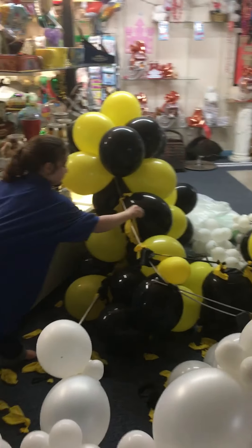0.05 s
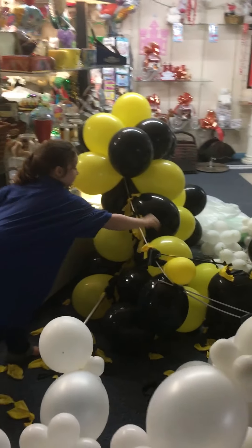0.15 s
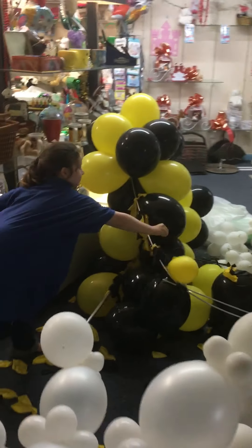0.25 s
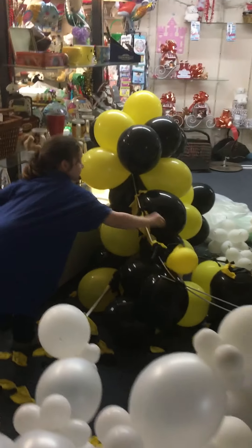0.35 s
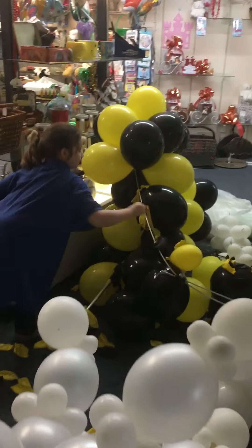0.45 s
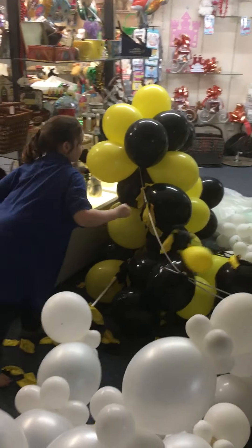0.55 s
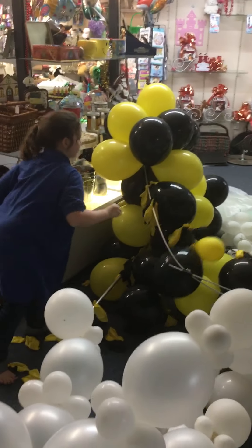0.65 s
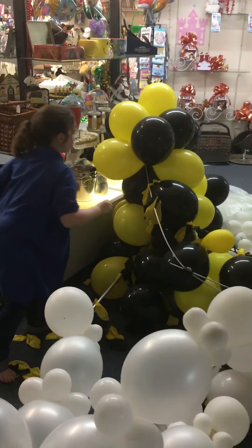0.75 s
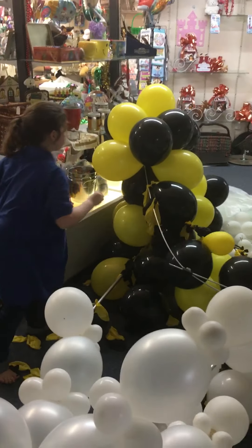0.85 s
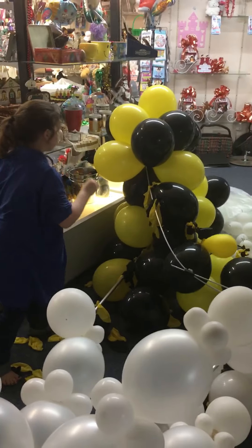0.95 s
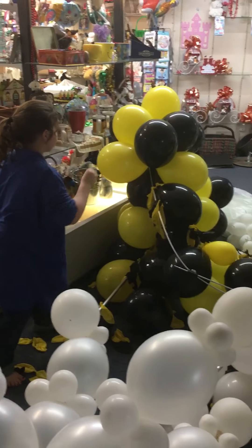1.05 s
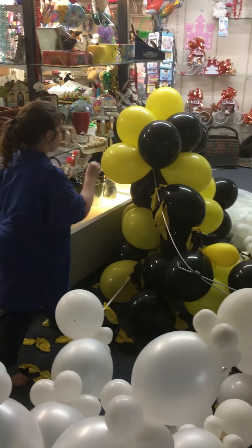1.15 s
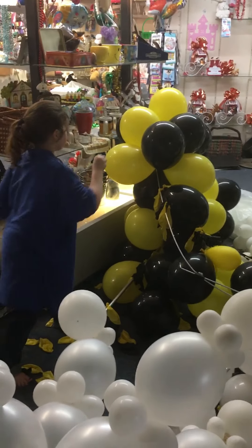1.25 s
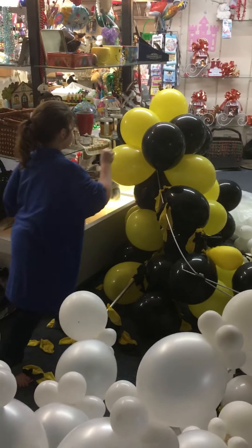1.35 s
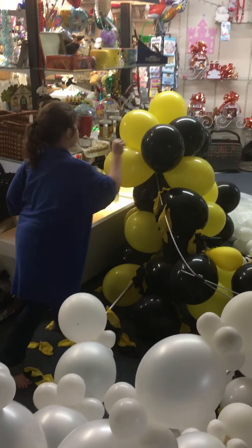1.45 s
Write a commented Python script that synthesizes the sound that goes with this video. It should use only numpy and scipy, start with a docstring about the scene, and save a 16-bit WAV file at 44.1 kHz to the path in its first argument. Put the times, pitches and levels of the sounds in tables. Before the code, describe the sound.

One balloon is pricked and bursts with a sharp, booming bang after a quiet moment; the small shop rings briefly, then rubber scraps and balloons rustle faintly over low rumble, heard by one microphone within the room.

```python
"""A low rumble and a faint rustle, then a balloon is pricked and bursts in a small, crowded, carpeted shop.
The pin snaps through the rubber; a moment later the skin rips open and the air thumps out, ringing the room.
Afterwards scraps of rubber land, the other balloons rustle faintly and a low hum swells and wavers.
Noises are coloured by spectrum tables, ringing is damped sines, the thump is a few pressure pulses."""
import sys
import numpy as np
from scipy import signal
from scipy.fft import rfft, irfft
from scipy.io import wavfile

SR = 44100
rng = np.random.default_rng(int(sys.argv[2]) if len(sys.argv) > 2 else 0)


def to_wav(sig):
    """Store sig (one row per channel, or 1-D mono) as 16-bit WAV at the path in sys.argv[1].

    Samples outside -1..1 are clipped; the rate is SR.
    """
    pcm = np.clip(np.atleast_2d(sig), -1, 1) * 32767
    pcm = np.round(pcm).astype(np.int16)
    wavfile.write(sys.argv[1], SR, pcm.T)  # frames by channels


N = 66150
TIME = np.arange(N) / SR

BURST_S = .2472   # the skin starts to rip
THUMP_DELAY_S = .0033


def from_db(db):
    """Decibels to gain."""
    return 10 ** (np.asarray(db) / 20)


def frequencies():
    """The frequency of each Fourier bin in Hz, at least 1."""
    return np.maximum(np.arange(N // 2 + 1) * SR / N, 1)


def at_hz(points, hz):
    """Read a table on a log-frequency axis."""
    table_hz, values = np.transpose(points)
    return np.interp(np.log(hz), np.log(table_hz), values)


def in_time(rows):
    """Join the rows of a curve by straight lines."""
    s, *columns = np.transpose(rows)
    return [np.interp(TIME, s, column) for column in columns]


def envelope(start_s, rise_s, t60_s, hold_s=0):
    """Linear rise, hold, exponential release."""
    age_s = TIME - start_s
    release_s = np.maximum(age_s - rise_s - hold_s, 0)
    return np.clip(age_s / rise_s, 0, 1) * from_db(-60 * release_s / t60_s)


def high_pass(x, hz):
    """Second-order bass cut."""
    sos = signal.butter(2, hz, "high", fs=SR, output="sos")
    return signal.sosfilt(sos, x + 1e-18)


def noise(spectrum):
    """Steady noise of rms 1 with the given colour."""
    white = rfft(rng.standard_normal(N))
    x = irfft(white * from_db(at_hz(spectrum, frequencies())), N)
    return x / x.std()


def ringing(modes, start_s, rise_s):
    """Damped sines that set in together."""
    out = np.zeros(N)
    for hz, db, t60_s in modes:
        tone = np.cos(2 * np.pi * hz * (TIME - start_s))
        out += from_db(db) * tone * envelope(start_s, rise_s, t60_s)
    return out


def pulse(peak_s, width_s):
    """One pressure peak flanked by suction."""
    u = (TIME - peak_s) / width_s
    return (1 - u ** 2) * np.exp(-u ** 2 / 2)


def reverberation(spectrum, start_s, build_s):
    """Dense reflections as noise in overlapping bands, dying away soonest in the top treble."""
    # decay time: centre_hz, t60_s
    decay_times = [(100, .26), (400, .28), (2000, .245), (6000, .245), (14000, 0.22)]
    wash = rfft(noise(spectrum))
    centres_hz, t60s = np.transpose(decay_times)
    out = np.zeros(N)
    for band, t60_s in zip(np.eye(len(centres_hz)), t60s):
        share = np.interp(np.log(frequencies()), np.log(centres_hz), band)
        out += irfft(wash * share, N) * envelope(start_s, build_s, t60_s)
    return out


def background():
    """Low rumble of the shop as coloured noise, and a wavering hum as a sine of gliding pitch."""
    # rumble colour: freq_hz, relative_db_per_hz
    floor_spectrum = [(25, -11), (50, -10), (73, 7), (95, -4), (122, 2.5), (165, -3), (240, -10),
                      (400, -19.5), (1000, -26), (2300, -27.5), (4500, -40.5), (7000, -39), (10500, -37),
                      (15000, -46.5)]
    # rumble level: time_s, level_db
    floor_level = [(0, -58), (.18, -63), (.5, -58), (.72, -56), (1.0, -60), (1.3, -58), (1.5, -59.5)]
    # hum: time_s, pitch_hz, level_db
    hum_curve = [(.82, 160.4, -74), (.88, 166.9, -53.5), (.935, 166.3, -53), (.975, 169, -73),
                 (1.01, 172.8, -52), (1.09, 163.8, -54), (1.17, 159.5, -56), (1.24, 159, -63.5),
                 (1.3, 163.5, -84.5)]
    floor_db, = in_time(floor_level)
    rumble = from_db(floor_db) * noise(floor_spectrum)
    hum_hz, hum_db = in_time(hum_curve)
    return rumble + from_db(hum_db) * np.sin(2 * np.pi * np.cumsum(hum_hz) / SR)


def rustles(grain_db=2.4, grain_hz=400, treble_hz=5000):
    """Soft grainy brushes of rubber, each with its own brightness, over the rubbing of the swaying bunch."""
    # scraps landing and balloons brushing each other: start_s, level_db, rise_s, t60_s, treble_db
    brush_events = [(.146, -70, 0.0032, .35, 3), (0.49, -66.5, 0.015, 0.26, 3),
                    (0.608, -63.5, 0.0016, 0.13, 1), (.655, -63.5, 0.0046, .33, -3),
                    (.805, -62.5, .025, .3, -2), (1.02, -74, 0.017, .45, 8.5), (1.11, -72, .008, 0.16, 3),
                    (1.245, -73, 0.0067, 0.092, 4), (1.39, -68, 0.0033, 0.069, -7.5)]
    # rubber colour: freq_hz, relative_db_per_hz
    rub_spectrum = [(150, -3), (480, 3), (800, -4), (1600, -6), (2600, -16), (3600, -20), (4400, -30),
                    (6000, -25.5), (7500, -27.5), (10500, -20), (15000, -32)]
    # jolted balloons rub together: time_s, level_db
    sway_level = [(.2, -95), (.3, -70), (.42, -60), (.56, -65), (.72, -66), (.79, -70), (.92, -69),
                  (1.0, -78)]
    rub = noise(rub_spectrum)
    treble = irfft(rfft(rub) / (1 + (treble_hz / frequencies()) ** 10), N)
    body = rub - treble
    sway_db, = in_time(sway_level)
    out = from_db(sway_db) * rub
    for start_s, db, rise_s, t60_s, treble_db in brush_events:
        brush = body + from_db(treble_db) * treble
        out += from_db(db) * envelope(start_s, rise_s, t60_s) * brush
    low_pass = signal.butter(2, grain_hz, fs=SR, output="sos")
    grain = signal.sosfilt(low_pass, rng.standard_normal(N))
    return out * from_db(grain_db * grain / grain.std())


def prick(start_s=.224, snap_db=-20, room_db=-38.5):
    """A tiny bright snap as the pin pierces the skin, and its trace in the room."""
    # reverberation colour: freq_hz, relative_db_per_hz
    prick_spectrum = [(60, -16), (140, 2), (300, 1), (500, -9.5), (1500, -9), (3400, -16), (4500, -29),
                      (6500, -26), (9000, -17), (15000, -22)]
    snap_hz, snap_rise_s, snap_t60_s = 11000, .00016, .0011
    snap = ringing([(snap_hz, snap_db, snap_t60_s)], start_s, snap_rise_s)
    return snap + from_db(room_db) * reverberation(prick_spectrum, start_s, build_s=.0004)


def rip(rip_db=-15.5, rise_s=.0022, hold_s=.006, t60_s=.052, skin_rise_s=.0015):
    """The tear races round the balloon in a few milliseconds and the taut skin rings as it lets go."""
    # tear colour: freq_hz, relative_db_per_hz
    rip_spectrum = [(60, -26), (250, -7), (500, -2), (750, -1), (1200, -2), (1800, -3), (2850, -8),
                    (3200, -19), (3700, -18), (4300, -29), (5600, -22), (6500, -24), (7700, -15),
                    (10000, -13), (15000, -21)]
    # skin modes: freq_hz, level_db, t60_s
    skin_modes = [(838, -21.5, 0.092), (1008, -21, .08), (1212, -16, 0.054), (1718, -24, .08),
                  (2600, -30, .07), (2905, -32, .07)]
    tear = from_db(rip_db) * noise(rip_spectrum) * envelope(BURST_S, rise_s, t60_s, hold_s)
    return tear + ringing(skin_modes, BURST_S, skin_rise_s)


def thump(low_cut_hz=74):
    """The freed air makes a broad pulse with a sharp front, repeated by nearby surfaces."""
    # early reflections: delay_s, relative_db
    early_reflections = [(.0052, -12.5), (0.0197, -11), (0.0277, -12.5)]
    thump_db, thump_width_s = -3, .0011
    crack_db, crack_width_s, crack_delay_s = -10, .00055, .003   # the sharp front
    direct = (.0005, 0)
    out = np.zeros(N)
    for delay_s, db in [direct] + early_reflections:
        arrival_s = BURST_S + delay_s
        out += from_db(thump_db + db) * pulse(arrival_s + THUMP_DELAY_S, thump_width_s)
        out += from_db(crack_db + db) * pulse(arrival_s + crack_delay_s, crack_width_s)
    return high_pass(out, low_cut_hz)


def shop_ring(room_db=-17.5, build_s=.006):
    """The thump rings the shop's resonances and fills it with reverberation."""
    # resonances: freq_hz, level_db, t60_s
    shop_modes = [(108, -28, .22), (152, -28, .28), (168, -24, .32), (213, -22, .17), (254.6, -18, .17),
                  (313.2, -23.5, .24), (365, -21, .18), (404, -21.5, 0.15), (451, -31, .29),
                  (587.7, -35, .25), (1077, -35, .21), (1203, -33, 0.24), (1298, -30, 0.16),
                  (1599, -32, 0.22), (1772, -30, .19), (2220, -32, 0.11)]
    # reverberation colour: freq_hz, relative_db_per_hz
    room_spectrum = [(30, -33), (60, -16), (110, -2), (330, 3.5), (470, -2), (650, -12), (1200, -8.5),
                     (1700, -9), (2850, -15.5), (3600, -23), (4400, -30), (5700, -24), (6700, -26),
                     (9500, -20.5), (15000, -28)]
    start_s = BURST_S + THUMP_DELAY_S
    diffuse = from_db(room_db) * reverberation(room_spectrum, start_s, build_s)
    return ringing(shop_modes, start_s, build_s) + diffuse


def ticks(low_cut_hz=8000, t60_s=.015):
    """Tiny crisp taps of a falling scrap: bursts of high-passed noise."""
    # taps: start_s, level_db
    tap_events = [(.608, -62), (.617, -58)]
    level = sum(from_db(db) * envelope(start_s, 1 / SR, t60_s) for start_s, db in tap_events)
    return high_pass(rng.standard_normal(N), low_cut_hz) * level


def scene():
    """Prick, bang and aftermath over the background, at one microphone."""
    quiet = background() + rustles() + ticks()
    bang = prick() + rip() + thump() + shop_ring()
    return (quiet + bang)[None]


def record(dry, top=1.2, low_cut_hz=35, cutoff_hz=15750):
    """The loudest peaks are rounded, the deep bass and the top are cut."""
    rounded = high_pass(top * np.tanh(dry / top), low_cut_hz)
    low_pass = signal.ellip(10, .2, 80, cutoff_hz, fs=SR, output="sos")
    return signal.sosfilt(low_pass, rounded)


dry = scene()
out = record(dry)
to_wav(out)
```